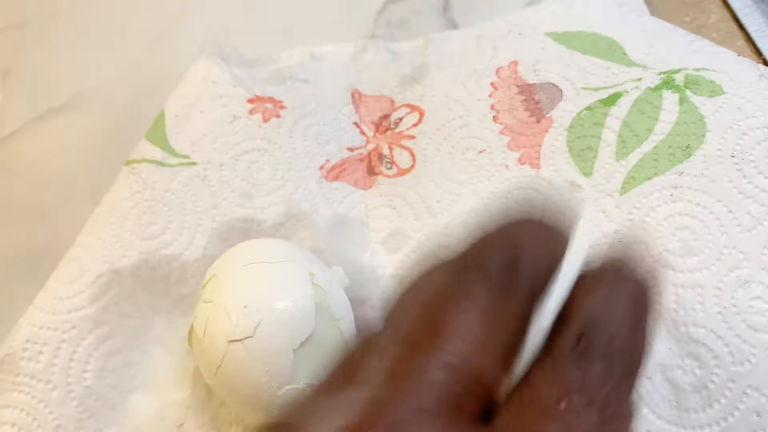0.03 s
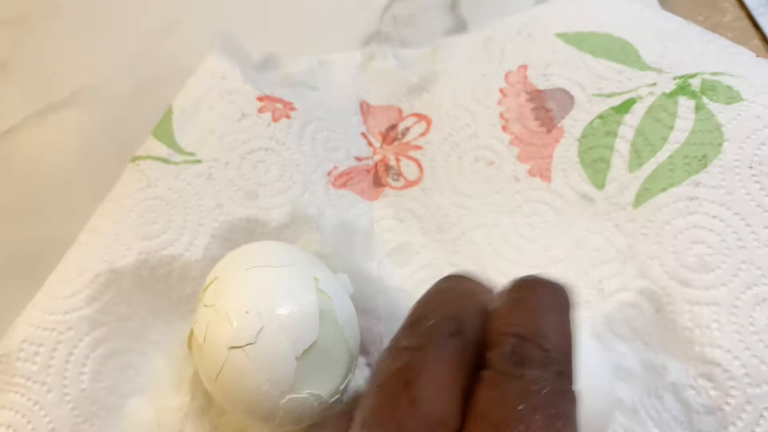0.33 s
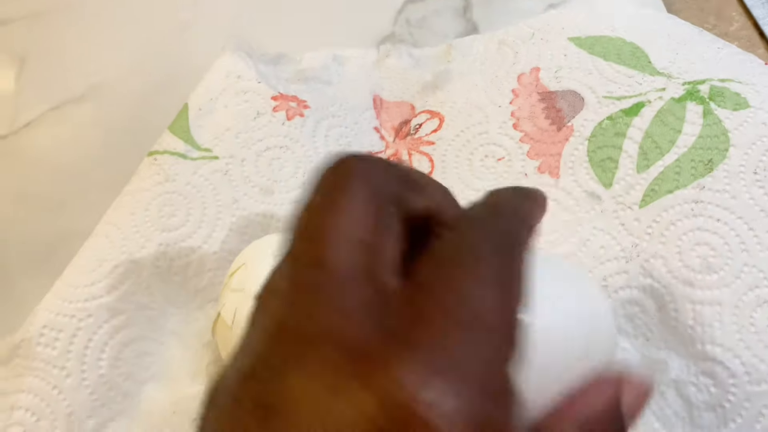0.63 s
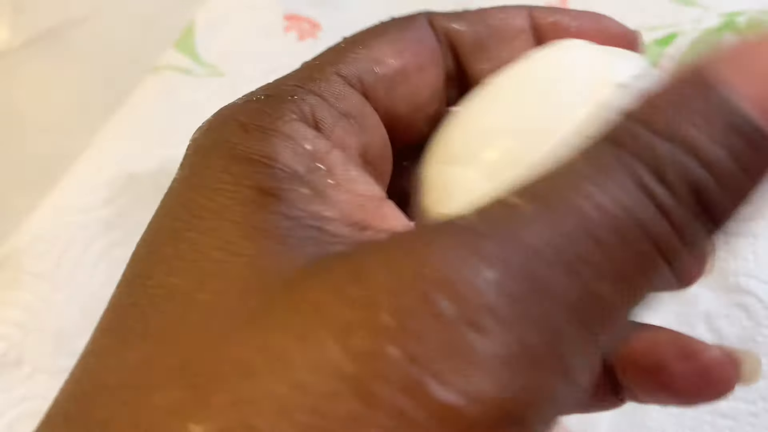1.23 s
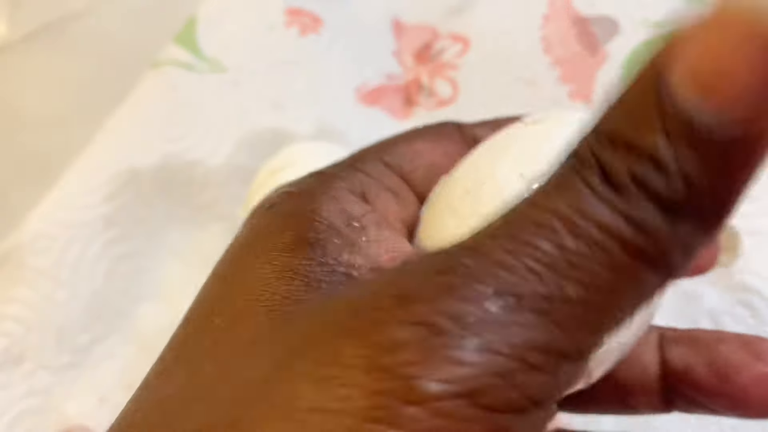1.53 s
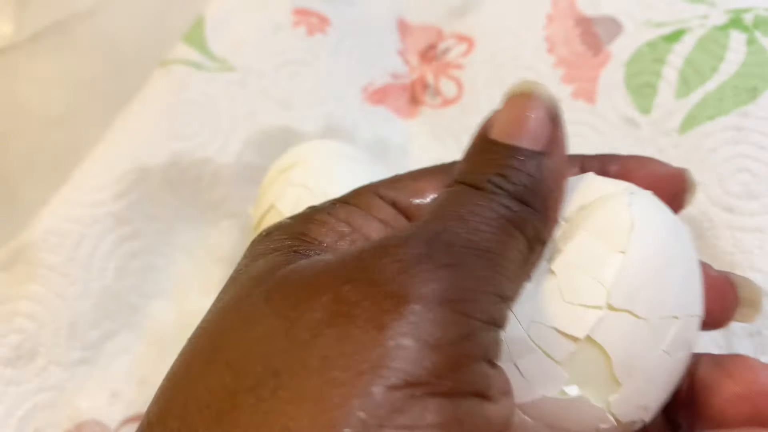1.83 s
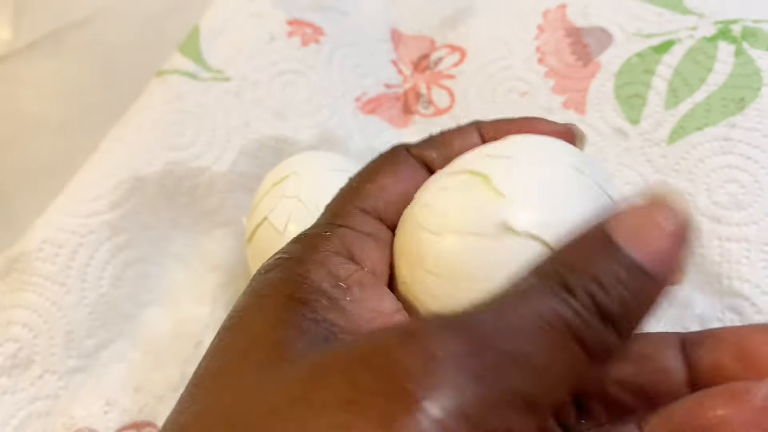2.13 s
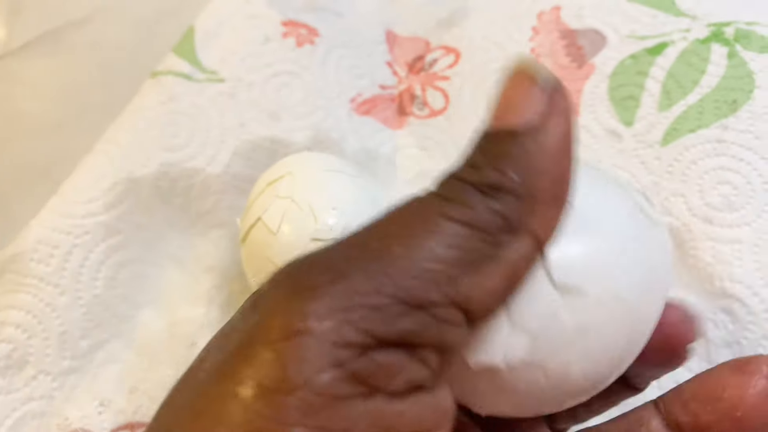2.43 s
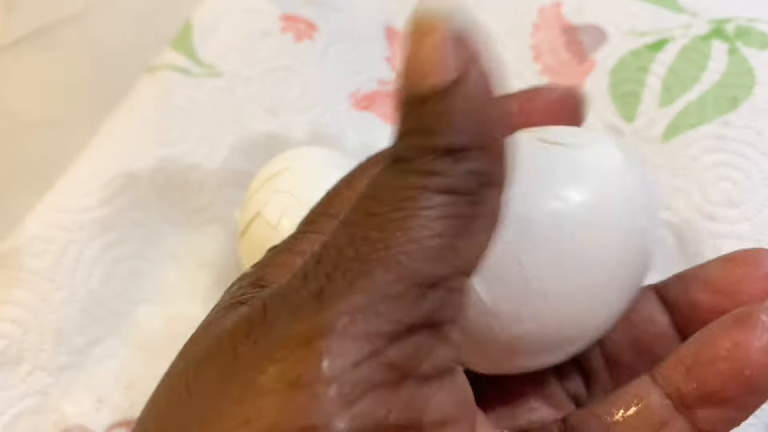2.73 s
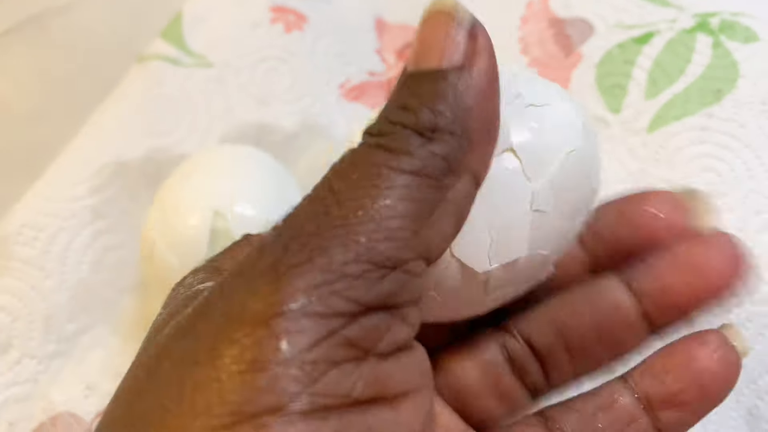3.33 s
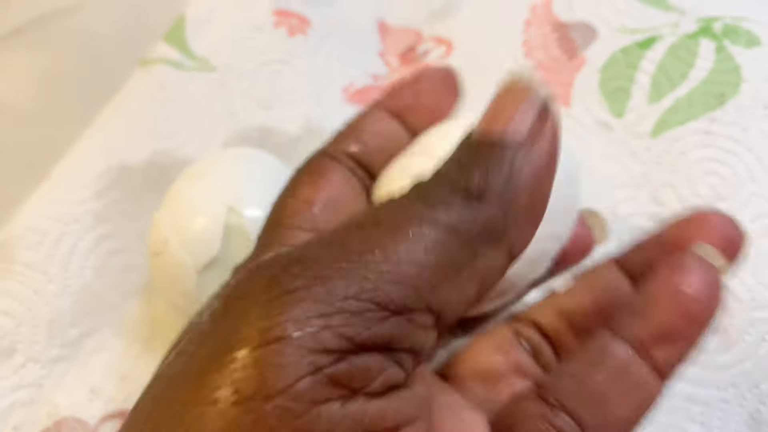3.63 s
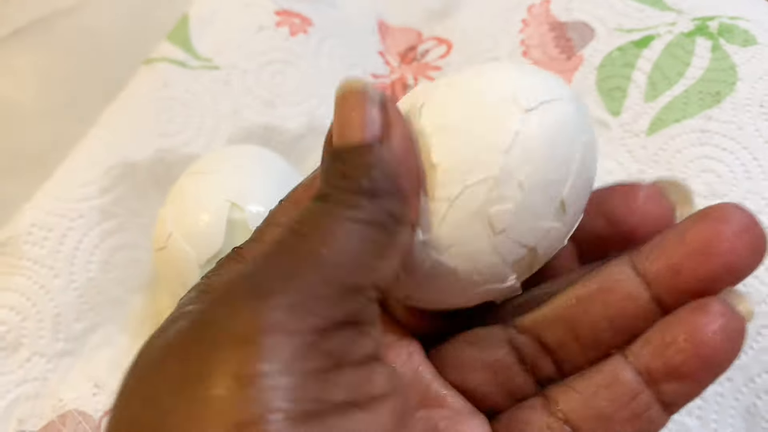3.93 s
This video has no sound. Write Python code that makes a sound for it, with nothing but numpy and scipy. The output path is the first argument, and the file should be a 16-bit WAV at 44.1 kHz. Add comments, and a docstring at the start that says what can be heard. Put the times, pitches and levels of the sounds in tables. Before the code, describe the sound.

Eggshell crunches as a boiled egg thuds twice on a counter through a paper towel, then crackles and snaps in short bursts under squeezing, sliding fingers. The microphone is close, in a small kitchen with a faint low rumble.

```python
"""A dying thud, then two crunching knocks and a light tap: a boiled egg hits a kitchen counter through
a paper towel, and the counter thuds and rings. The egg is then turned and squeezed in the hand. Each
squeeze crumbles the shell in a swarm of tiny fractures and a few sharp snaps. The cracked shell scrapes
grittily under sliding fingers and in one dense crunch mid-squeeze. A close pair of microphones hears it
in a small room with a low rumble."""
import sys
import numpy as np
from scipy import signal
from scipy.fft import rfft, irfft, next_fast_len
from scipy.io import wavfile
from scipy.ndimage import uniform_filter1d

SR = 44100
rng = np.random.default_rng(int(sys.argv[2]) if len(sys.argv) > 2 else 0)


def pcm_store(signal):
    """Save signal as 16-bit PCM."""
    levels = np.round(np.clip(np.atleast_2d(signal), -1, 1) * 32767)
    wavfile.write(sys.argv[1], SR, levels.astype(np.int16).T)


N = 176400
TIME_S = np.arange(N) / SR


# crunch spectrum: f/Hz, gain/dB
CRUNCH_SPECTRUM = [(100, -4), (400, 5.5), (550, -2), (850, 1.5), (1300, 2.5), (2400, -3), (3100, -7),
                   (4800, -5), (5500, -6), (7200, -1), (8500, -13), (9500, -8.5), (11500, -13.5),
                   (16000, -20)]
def shell_crunch(t, hollow_hz):
    """The towel cushions the blow, then the shell caves in with a hollow note."""
    towel_rise_s, hold_s, fade_s = 0.0024, 0.0042, 0.0055
    crush = np.exp(np.minimum(t, 0) / towel_rise_s - np.maximum(t - hold_s, 0) / fade_s)
    crunch = colour(crush * grains(per_s=12000, spread_db=1.9)[:len(t)], CRUNCH_SPECTRUM)
    return crunch + 6.3 * resonate(crunch, hollow_hz, width_hz=25)


# low counter modes: f/Hz, gain/dB, t60/s
THUD_MODES = [(61, -8, 0.44), (173.9, 6.5, 0.12), (228, -11, 0.19), (375, -24, 0.46)]
def counter_thud(t):
    """The counter's low modes build up just after the blow."""
    delay_s, rise_s = 0.0043, 0.011
    age = np.maximum(t - delay_s, 0)
    return np.minimum(age / rise_s, 1) * damped_sines(THUD_MODES, age)


# high counter modes: f/Hz, gain/dB, t60/s
RING_MODES = [(582, -13, 0.13), (650, 9, 0.059), (702, 1.5, 0.079), (856, 1, 0.16), (1000, 3, 0.16),
              (2004, 6, .14), (3160, 2, 0.25), (3560, -4.5, 0.18), (4900, -2.5, 0.16), (8000, -7, 0.074)]
def counter_ring(t):
    """The counter and what stands on it ring with a fluttering level."""
    flutter = 1 + 0.5 * unit(uniform_filter1d(rng.standard_normal(len(t)), size=300))
    return flutter * damped_sines(RING_MODES, np.maximum(t, 0))


# blows: t/s, crunch level/dB, thud level/dB, ring level/dB, hollow f/Hz
EGG_KNOCKS = [(-.11, -21.5, -32.5, -34.5, 1034), (0.0944, -25, -26.5, -46.5, 885),
              (0.3348, -26.5, -27, -49, 687.5), (.811, -60, -64, -72, 683)]
def knocks():
    """Each blow crunches the shell and shakes the counter; the first falls before t = 0."""
    lead_s = 0.013
    out, t = np.zeros((2, N)), np.arange(SR) / SR - lead_s
    for at_s, crunch_db, thud_db, ring_db, hollow_hz in EGG_KNOCKS:
        crunch = amp(crunch_db) * shell_crunch(t, hollow_hz)
        ring = amp(ring_db) * counter_ring(t)
        thud = amp(thud_db) * counter_thud(t)
        knock = in_room(crunch, wet_db=-12) + in_room(ring, wet_db=-11) + in_room(thud, wet_db=-17)
        add(out, at_s - lead_s, knock)
    return out


# shell plate and tick spectra: f/Hz, gain/dB
PLATE_SPECTRUM = [(100, -21), (500, -17.5), (1100, -6.5), (2100, -0.5), (3200, -1), (4400, -6), (7000, 0.5),
                  (16000, -38.5)]
TICK_SPECTRUM = [(1000, -38.5), (4500, -16.5), (7000, 2.5), (8600, -1.5), (10800, 5), (13000, -2.5),
                 (15000, 0), (17000, -14)]
# single fractures: t/s, plate level/dB, plate f/Hz, tick level/dB
SHELL_SNAPS = [(.0952, -29.5, 3080, -28.5), (0.3371, -30.5, 2800, -28.5), (0.467, -51, 3970, -54.5),
               (.526, -66, 3500, -57), (0.535, -48, 3560, -55.5), (0.556, -55.5, 3530, -57),
               (0.978, -41, 2330, -42.5), (1.0221, -34.5, 2380, -33.5), (1.052, -62, 4640, -46),
               (1.073, -50.5, 2990, -50.5), (1.1596, -55.5, 2260, -54.5), (1.3245, -49.5, 2480, -46),
               (1.3595, -59, 5700, -38.5), (1.365, -55, 2320, -42), (1.3885, -50, 3500, -36),
               (1.395, -61, 2850, -37.5), (1.7084, -38.5, 2850, -58), (1.7477, -38, 2730, -47.5),
               (1.782, -48, 3600, -33), (1.7888, -50, 3350, -31.5), (1.7959, -48, 3330, -42),
               (1.8126, -61, 5280, -40), (2.126, -45, 3200, -63), (2.168, -30, 3200, -40),
               (2.1716, -48, 3030, -32.5), (2.178, -46, 3280, -45), (2.1952, -40.5, 2570, -51),
               (2.241, -40, 2960, -39.5), (2.2668, -69, 3860, -36.5), (2.2903, -36, 3180, -33.5),
               (2.3018, -36.5, 3940, -39), (2.311, -44.5, 3060, -52), (2.3367, -49, 2670, -45.5),
               (2.3709, -47, 2800, -48), (2.5334, -42.5, 2680, -44.5), (2.552, -52.5, 3690, -32),
               (2.5574, -45.5, 3300, -34), (2.6154, -47.5, 3640, -56), (2.8892, -40, 3330, -56),
               (2.9313, -31, 5300, -36.5), (3.052, -41, 2770, -77), (3.0638, -40, 3150, -84),
               (3.1382, -71, 2940, -59), (3.208, -44.5, 2740, -64), (3.2175, -33, 2190, -66),
               (3.232, -37.5, 2700, -42), (3.2352, -36.5, 2950, -48), (3.266, -35.5, 1880, -33.5),
               (3.2947, -42, 2290, -52), (3.3124, -46, 2380, -56), (3.5085, -54.5, 3380, -50),
               (3.776, -29, 3220, -44.5), (3.7841, -34, 3270, -44), (3.8038, -27.5, 3470, -44),
               (3.8123, -20.5, 3920, -30), (3.828, -28, 4070, -21), (3.848, -23, 4000, -32),
               (3.8624, -27.5, 2970, -37.5), (3.899, -38, 4500, -45.5), (3.9361, -37.5, 2500, -58),
               (3.961, -36, 3100, -50)]
def snaps(size=1024):
    """Each fracture runs up, gives a bright tick and rings a small plate of shell."""
    lead_s, rise_s, fall_s, tail_s = 0.003, 0.0005, 0.00032, 0.001
    plate_width_hz, level_window_s = 1000, 0.003
    out, t = np.zeros(N), np.arange(size) / SR
    age = np.maximum(t - lead_s, 0)
    run_up = np.exp(np.minimum(t - lead_s, 0) / rise_s)
    tear = run_up * (np.exp(-age / fall_s) + 0.17 * np.exp(-age / tail_s))
    for at_s, plate_db, plate_hz, tick_db in SHELL_SNAPS:
        plate_burst, tick_burst = rng.standard_normal((2, size)) * tear
        broad = unit(colour(plate_burst, PLATE_SPECTRUM))
        mode = np.exp(-np.pi * plate_width_hz * t) * np.cos(2 * np.pi * plate_hz * t)
        ringing = unit(signal.fftconvolve(broad, mode)[:size])
        plate = amp(plate_db) * unit(0.8 * ringing + 0.2 * broad)
        tick = amp(tick_db) * unit(colour(tick_burst, TICK_SPECTRUM))
        add(out, at_s - lead_s, plate + tick)
    return np.sqrt(level_window_s * SR / size) * out


# squeezes: start t/s, length/s, crackle level/dB, fizz level/dB
HAND_SQUEEZES = [(0.971, 0.034, -43.5, -53), (1.323, 0.097, -47.5, -48.5), (1.713, 0.063, -49, -62),
                 (1.753, 0.063, -44, -50.5), (2.143, 0.094, -54.5, -69), (2.188, 0.12, -51.5, -55),
                 (2.482, 0.005, -55, -57.5), (2.533, 0.058, -52, -53.5), (2.65, 0.016, -48, -56),
                 (2.836, 0.025, -52, -67), (2.868, 0.05, -40, -44), (3.202, 0.059, -44, -57.5),
                 (3.363, 0.037, -51.5, -60.5), (3.799, .07, -38.5, -45), (3.886, 0.091, -50, -55.5)]
def crumbling():
    """Clumps of tiny fractures ring the patch of shell that the hand presses."""
    rise_s, fall_s, clump_s, clump_db = 0.0091, 0.0057, 0.0048, 5.5
    crackle_gain = fizz_gain = 0
    for start_s, length_s, crackle_db, fizz_db in HAND_SQUEEZES:
        age = TIME_S - start_s
        press = np.exp(np.minimum(age, 0) / rise_s - np.maximum(age - length_s, 0) / fall_s)
        crackle_gain = np.maximum(crackle_gain, amp(crackle_db) * press)
        fizz_gain = np.maximum(fizz_gain, amp(fizz_db) * press)
    knots_s = np.arange(0, N / SR, clump_s)
    wander = np.interp(TIME_S, knots_s, rng.standard_normal(N)[:len(knots_s)])
    clumps = unit(amp(clump_db * wander))
    cracks = clumps * grains(per_s=2000, spread_db=1.5)
    fine_cracks = clumps * grains(per_s=900, spread_db=1.3)
    crackle = colour(cracks * crackle_gain, PLATE_SPECTRUM)
    fizz = colour(unit(cracks + fine_cracks) * fizz_gain, TICK_SPECTRUM)
    return 0.83 * crackle + 0.97 * shell_patch(crackle, width_hz=480) + fizz


# patch resonance: t/s, f/Hz
PATCH_PITCH = [(1.15, 2270), (1.55, 2900), (1.9, 3530), (2.65, 3376), (3.3, 3000), (3.8, 3340)]
def shell_patch(x, width_hz):
    """The shell under the fingers resonates at a pitch that moves as the egg turns."""
    return resonate(x, np.interp(TIME_S, *np.transpose(PATCH_PITCH)), width_hz)


# scrape spectrum: f/Hz, gain/dB
SCRAPE_SPECTRUM = [(100, -4.5), (350, -9.5), (700, -10), (1300, -5), (2300, 0.5), (3400, -3.5),
                   (4500, -5.5), (5600, -4.5), (7500, -12.5), (11000, -15.5), (16000, -16)]
# scrapes: centre t/s, half length/s, level/dB
SHELL_SCRAPES = [(1.04, 0.028, -56), (1.16, 0.022, -55), (1.275, 0.0067, -56.5), (1.53, 0.016, -53.5),
                 (1.628, 0.0032, -55.5), (1.918, 0.02, -52), (2.61, 0.056, -63), (2.67, .035, -63),
                 (2.893, 0.028, -47.5), (3.045, 0.032, -52), (3.32, 0.16, -64), (3.43, 0.055, -61),
                 (3.515, 0.0035, -54), (3.755, 0.015, -55.5), (3.97, 0.046, -54)]
def shell_scrapes():
    """Gritty scraping of cracked shell, under sliding fingers and in one dense crunch mid-squeeze."""
    grit = colour(grains(per_s=3700, spread_db=4), SCRAPE_SPECTRUM)
    return unit(grit + 3.1 * shell_patch(grit, width_hz=900)) * swells(SHELL_SCRAPES)


# squeaks: centre t/s, half length/s, level/dB, f/Hz
SKIN_SQUEAKS = [(2.411, 0.0081, -67, 1050), (3.104, 0.015, -58.5, 880)]
def skin_squeaks(width_hz=450):
    """Damp skin slips on the shell and squeaks softly."""
    out, slips = np.zeros(N), rng.standard_normal(N)
    for *stroke, hz in SKIN_SQUEAKS:
        band = resonate(resonate(slips, hz, width_hz), hz, width_hz)
        out += unit(band) * swells([stroke])
    return out


# towel spectrum: f/Hz, gain/dB
BRUSH_SPECTRUM = [(60, -34.5), (180, -1.5), (330, 7), (520, -7), (750, -14.5), (1200, -11), (2000, -20.5),
                  (6000, -27), (16000, -24)]
# strokes: centre t/s, half length/s, level/dB
BRUSH_STROKES = [(.76, 0.2, -68), (1.77, 0.05, -60.5), (3.24, 0.041, -64)]
def towel_brushes():
    """The hand brushes softly over the paper towel."""
    return colour(grains(per_s=4000, spread_db=2.5) * swells(BRUSH_STROKES), BRUSH_SPECTRUM)


# swells: centre t/s, half length/s, level/dB
TREMBLE_SWELLS = [(.28, .05, -49.5), (.53, 0.034, -46.5)]
def counter_tremble():
    """The counter's lowest mode swells faintly between knocks."""
    lowest_hz = THUD_MODES[0][0]
    return swells(TREMBLE_SWELLS) * np.sin(2 * np.pi * lowest_hz * TIME_S)


# rumble spectrum: f/Hz, gain/dB
RUMBLE_SPECTRUM = [(20, -16), (36, -10), (58, 5.5), (78, -1.5), (110, -4.5), (160, -15.5), (300, -18.5),
                   (600, -28.5), (1200, -32), (3000, -39.5), (7000, -38), (16000, -45.5)]
def room_rumble(level_db=-65.5):
    """Quiet low noise, partly different at each microphone."""
    common, left, right = (colour(rng.standard_normal(N), RUMBLE_SPECTRUM, size=8192) for _ in range(3))
    return amp(level_db) * unit(common + 0.98 * np.array([left, right]))


# left minus right: f/Hz, phase/rad
LEFT_LEAD_RAD = [(170, 0.67), (400, 1.78), (1300, 1.81), (2300, 2), (2700, 3.5), (3500, 5.5), (5340, 8.5),
                 (7840, 10), (11500, 6), (16000, 0)]
# left minus right: f/Hz, level/dB
LEFT_EXCESS_DB = [(60, 2.5), (150, 0), (300, 0), (1000, 0), (4000, -4.5), (8000, -5.5), (13000, 2.5)]
def microphone_pair(x):
    """Direct sound reaches the two microphones with different phase and level."""
    n = next_fast_len(len(x) + 256)
    hz = np.fft.rfftfreq(n, 1 / SR)
    left = amp(curve(LEFT_EXCESS_DB, hz) / 2) * np.exp(0.5j * curve(LEFT_LEAD_RAD, hz))
    return irfft(rfft(x, n) * np.array([left, 1 / left]), n)[:, :len(x)]


# room decay: f/Hz, t60/s
ROOM_T60 = [(160, 0.78), (800, 0.49), (3000, 0.74), (8000, 0.32), (16000, 0.4)]
def in_room(x, wet_db):
    """Direct sound, early reflections off hand and counter, and the room's tail at wet_db."""
    early_db, early_gap_s, early_fade_s, tail_rise_s = -11, 0.0007, 0.0079, 0.0028
    t = np.arange(SR // 2) / SR
    hz, frame_s, spectra = signal.stft(rng.standard_normal((2, len(t))), SR, nperseg=256)
    decay = amp(-60 * frame_s / curve(ROOM_T60, hz)[:, None])
    tail = signal.istft(spectra * decay, SR, nperseg=256)[1][:, :len(t)]
    tail *= np.minimum(t / tail_rise_s, 1)
    early = rng.standard_normal((2, len(t))) * np.exp(-t / early_fade_s) * (t > early_gap_s)
    response = (amp(wet_db) * unit(tail) + amp(early_db) * unit(early)) / np.sqrt(len(t))
    return microphone_pair(x) + signal.fftconvolve(x[None], response, axes=1)[:, :len(x)]


def amp(db):
    """Decibels to gain."""
    return 10 ** (np.asarray(db) / 20)


def unit(x):
    """Scales to rms 1."""
    return x / np.sqrt(np.mean(x ** 2) + 1e-20)


def curve(points, hz):
    """Interpolates a table on a log-frequency axis."""
    knots_hz, values = np.transpose(points)
    return np.interp(np.log(hz + 1), np.log(knots_hz + 1), values)


def add(mix, at_s, sound):
    """Mixes a sound in at at_s, which may be negative."""
    at = round(at_s * SR)
    sound, part = sound[..., max(-at, 0):], mix[..., max(at, 0):]
    n = min(sound.shape[-1], part.shape[-1])
    part[..., :n] += sound[..., :n]


def colour(x, spectrum, size=2048):
    """Minimum-phase filter; keeps the power of white noise."""
    hz = abs(np.fft.fftfreq(size, 1 / SR))
    log_gain = np.log(amp(curve(spectrum, hz)))
    taps = np.fft.ifft(np.exp(np.conj(signal.hilbert(log_gain)))).real
    return signal.fftconvolve(x, taps / np.linalg.norm(taps))[:len(x)]


def resonate(x, hz, width_hz):
    """Resonance of gain 1 at a steady or moving pitch."""
    carrier = np.exp(2j * np.pi * np.cumsum(hz * np.ones(len(x))) / SR)
    pole = np.exp(-np.pi * width_hz / SR)
    return 2 * (carrier * signal.lfilter([1 - pole], [1, -pole], x / carrier + 1e-18)).real


def grains(per_s, spread_db):
    """Random clicks, mostly tiny and a few large, at rms 1."""
    sizes = amp(spread_db * np.minimum(rng.exponential(1, N), 4.5))
    return unit(sizes * rng.standard_normal(N) * (rng.random(N) < per_s / SR))


def swells(rows):
    """Gaussian envelopes, summed in power."""
    powers = (amp(db) ** 2 * np.exp(-((TIME_S - at_s) / half_s) ** 2) for at_s, half_s, db in rows)
    return np.sqrt(sum(powers))


def damped_sines(modes, t):
    """Dying modes of a struck body."""
    return sum(amp(db - 60 * t / t60) * np.sin(2 * np.pi * hz * t) for hz, db, t60 in modes)


def scene():
    """Knocks, then the shell in the hand, over the room's rumble."""
    on_counter = knocks() + counter_tremble()
    in_hand = snaps() + crumbling() + shell_scrapes() + skin_squeaks() + towel_brushes()
    return on_counter + in_room(in_hand, wet_db=-18.5) + room_rumble()


def record(dry):
    """Low cut and band limit."""
    low_cut_hz, edge_hz = 50, 16100
    low_cut = signal.butter(2, low_cut_hz, "high", fs=SR, output="sos")
    band_limit = signal.firwin(401, edge_hz, window=("kaiser", 8), fs=SR)
    return signal.oaconvolve(signal.sosfilt(low_cut, dry), band_limit[None], "same")


dry = scene()
out = record(dry)
pcm_store(out)
```